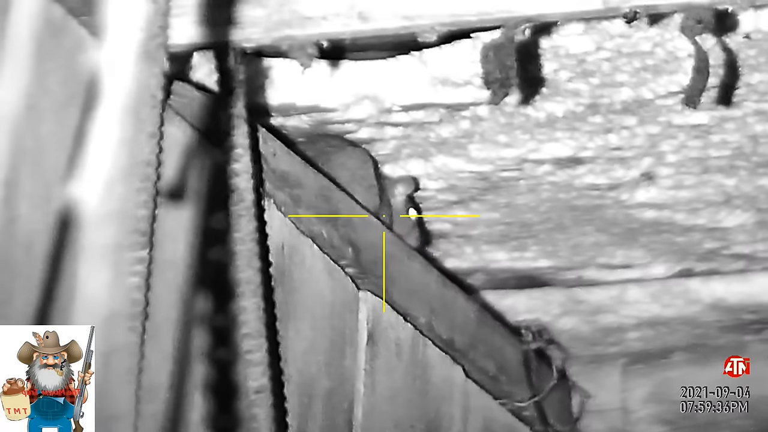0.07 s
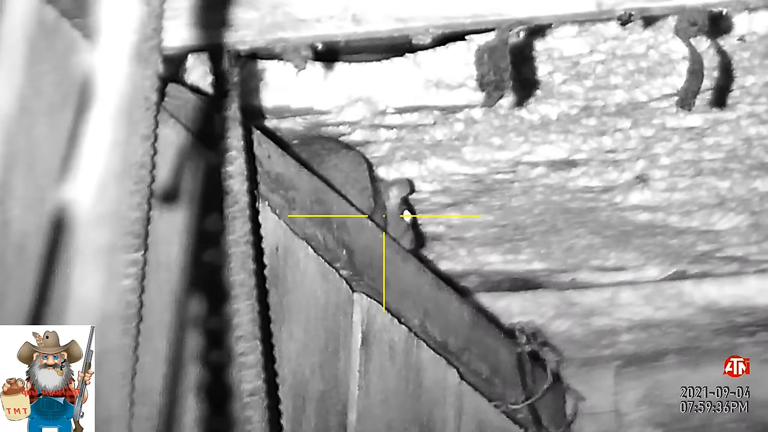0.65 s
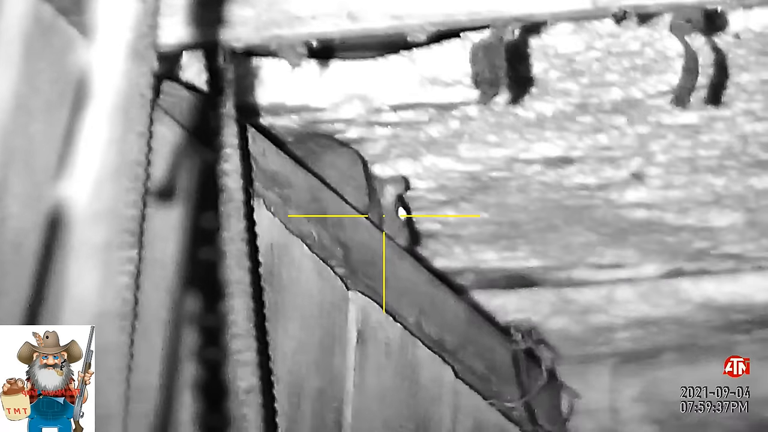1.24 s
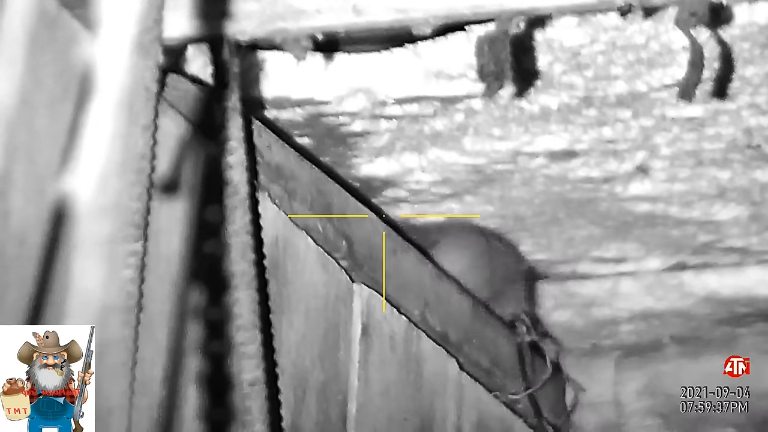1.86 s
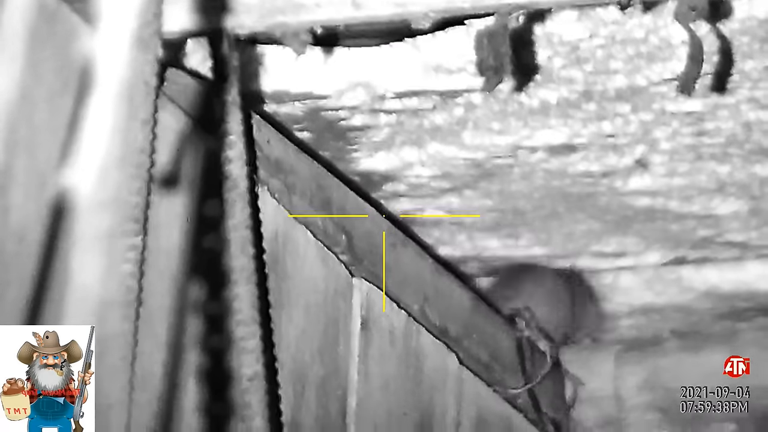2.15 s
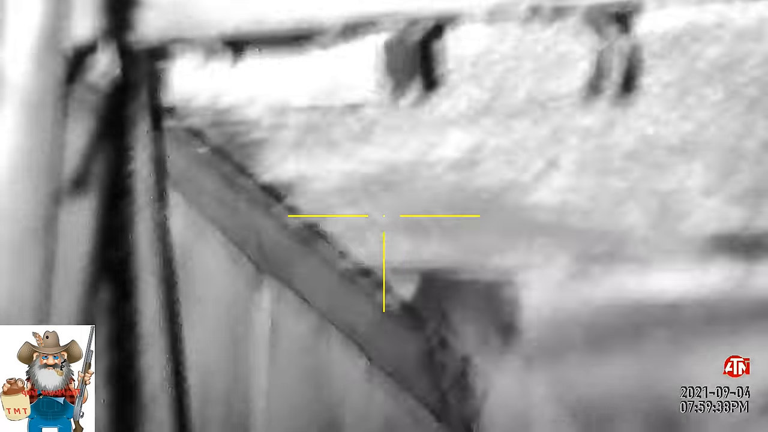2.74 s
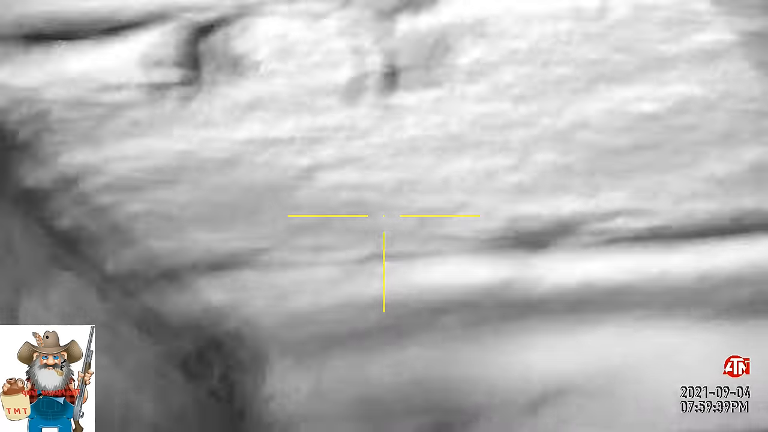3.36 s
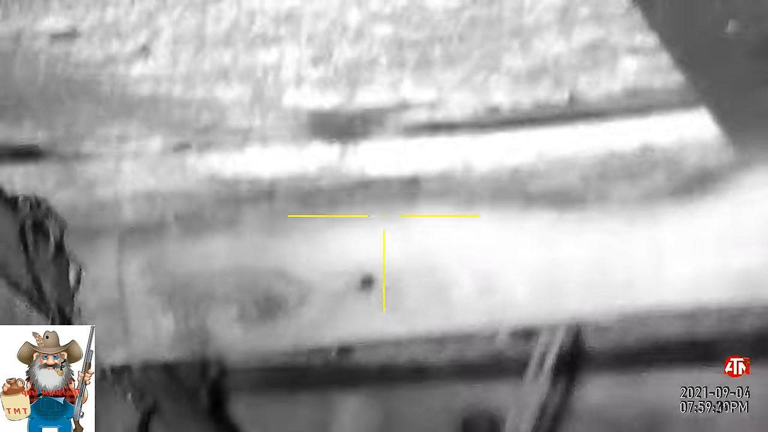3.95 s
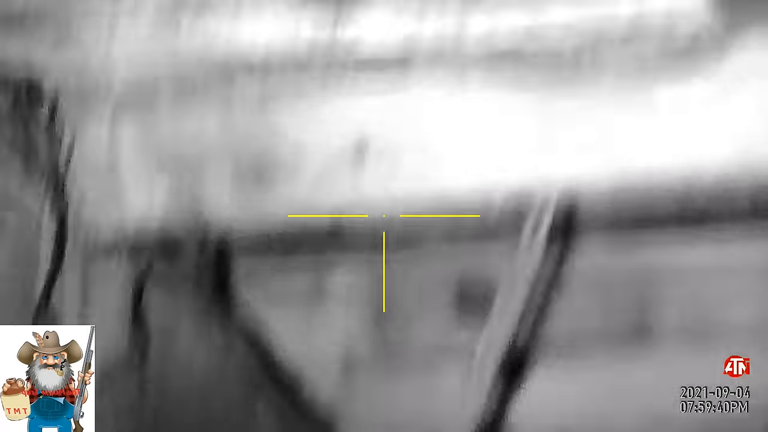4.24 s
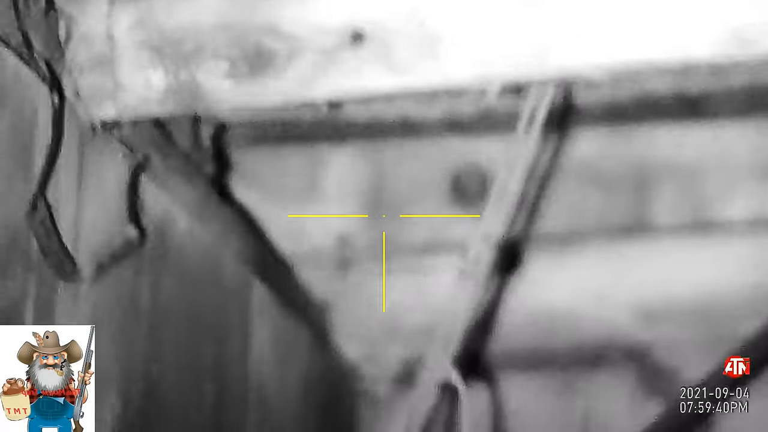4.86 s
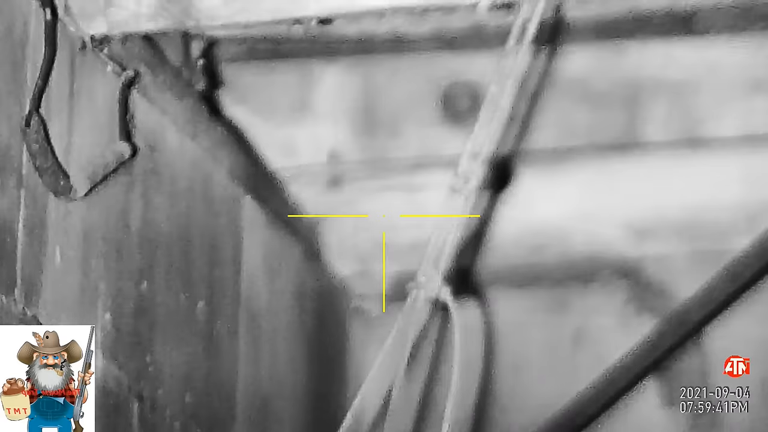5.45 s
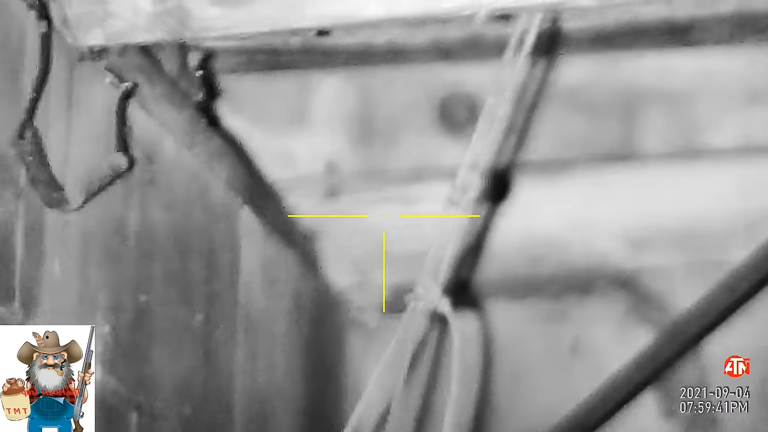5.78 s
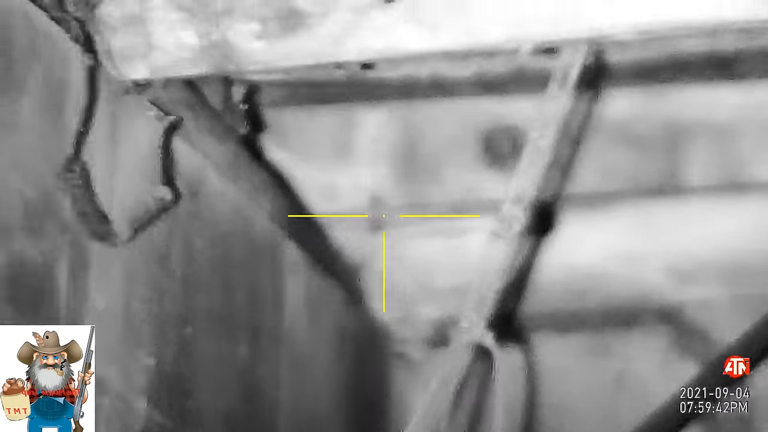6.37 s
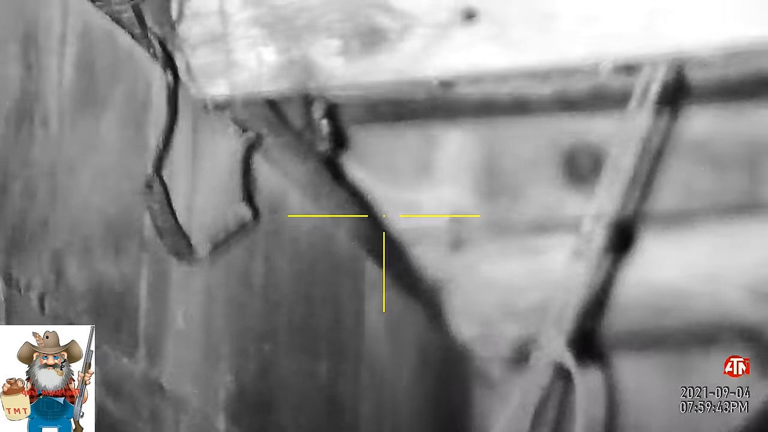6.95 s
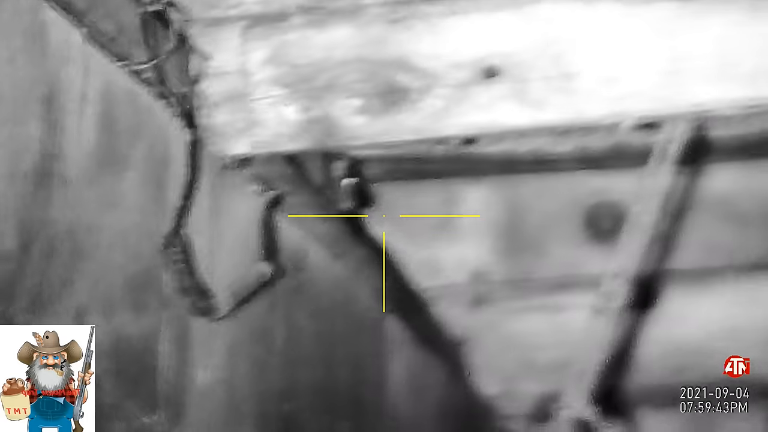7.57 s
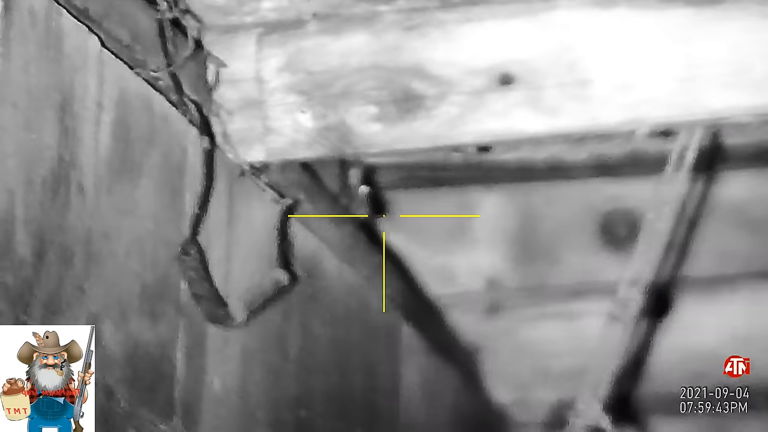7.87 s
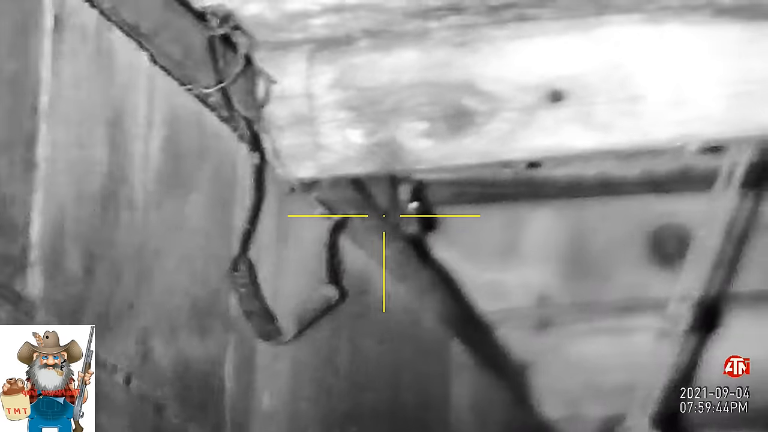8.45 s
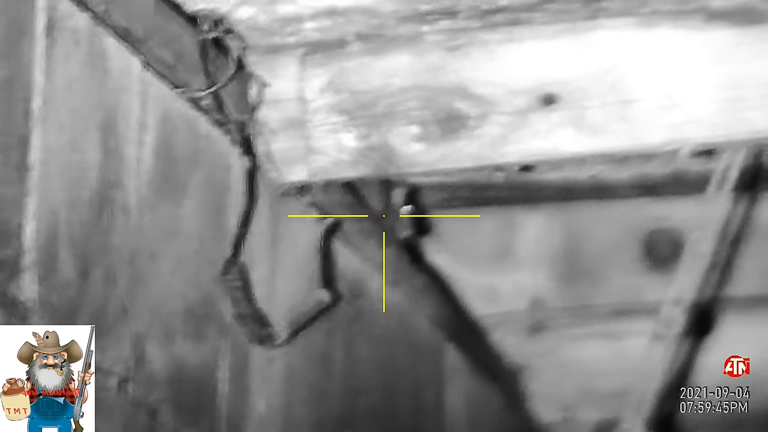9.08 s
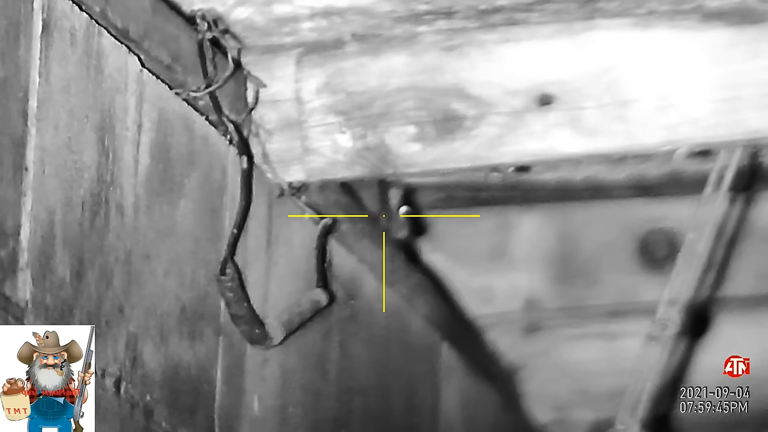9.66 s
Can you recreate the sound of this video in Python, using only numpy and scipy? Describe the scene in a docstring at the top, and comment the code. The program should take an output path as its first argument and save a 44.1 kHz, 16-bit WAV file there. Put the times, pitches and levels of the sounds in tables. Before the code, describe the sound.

A cricket chirps steadily in a farm building at night, over faint hiss and hum. An air rifle fires once, right at the microphone, with a loud, sharp crack and a short echo. About a second later its action is cycled in a quick run of metal clicks and scrapes. A few softer knocks and hand rubs follow, then the cricket carries on with only an odd small click.

```python
"""An air rifle fires once at night: the hammer strikes the valve, air bursts from the muzzle and a
farm building throws the report back. The action is cycled in a run of sharp metal clicks and scrapes,
and hands rub on the rifle, all right at the microphone in its sight. Behind it a cricket chirps
steadily in the building, each wing stroke a falling tone, over a bed of soft air, far insects,
faint whistles, a low motor hum and the thin whine of the sight's electronics."""
import sys
import numpy as np
from scipy import signal
from scipy.fft import rfft, irfft
from scipy.io import wavfile
from scipy.ndimage import uniform_filter1d, minimum_filter1d

SR = 44100
rng = np.random.default_rng(int(sys.argv[2]) if len(sys.argv) > 2 else 0)


def generate_wav(sig):
    """Save sig (samples, or channels by samples) to the path in sys.argv[1] as 16-bit PCM at SR."""
    pcm = np.round(np.clip(np.atleast_2d(sig).T, -1, 1) * 32767).astype(np.int16)
    wavfile.write(sys.argv[1], SR, pcm)


N = 428652
T = np.arange(N) / SR

# Night air and microphone hiss. Each row: frequency in Hz, relative level in dB.
AIR_EQ = [(20, 12.5), (45, 1), (100, -1.5), (250, -3), (500, -2), (1000, -1), (1700, -6), (2900, -9.5),
          (5600, -11.5), (10500, -13), (15500, -12)]
# The far motor's tones. Each row: pitch in Hz, level in dB.
MOTOR_TONES = [(85, -85), (212, -91), (255, -87.5), (382, -79.5)]
# A low murmur of air, then far insects. Each row: centre in Hz, width in Hz, level in dB,
# throbs a second, throb depth from 0 to 1.
DRONE_BANDS = [(363.8, 110, -77.5, 0.92, .05), (2170, 900, -84, 9.6, .3), (4934, 490, -74, 3.1, .25),
               (6254, 490, -77.5, 7, .3), (7400, 1100, -76, 5.5, .6)]
# The sight's whine. Each row: centre in Hz, width in Hz, level in dB, pulsing share from 0 to 1.
WHINE_BANDS = [(12770, 450, -66, .2), (14150, 1200, -70.5, .55)]
# The building's reverb, scaled for each space. Each row: frequency in Hz, time to fall 60 dB in seconds.
BUILDING_DECAY = [(100, 0.93), (350, 0.77), (700, 0.68), (1500, .58), (3000, .54), (6000, .47),
                  (10000, .39), (15000, 0.51)]
# The cricket's runs of chirps. Each entry: start in seconds.
RUN_STARTS = [.042, 1.884, 2.122, 4.425, 5.583, 6.738, 8.589, 8.837]
# Resonances of the cricket's corner and of the rifle's metal action, small parts and stock.
# Each row: frequency in Hz, width in Hz, relative level in dB.
CORNER_MODES = [(3570, 40, -11.5), (3500, 12, -7.5), (3682, 45, -5), (3896, 30, 3), (4000, 54, -10.5)]
ACTION_MODES = [(2276, 130, -2), (2600, 200, -4.5), (3505, 88, -7), (4330, 340, -2), (4910, 150, -4),
                (5824, 550, -13)]
SMALL_PART_MODES = [(7050, 130, -8), (8490, 190, 1.5), (9540, 440, 2), (11800, 3300, -3),
                    (14200, 3800, -10.5)]
STOCK_MODES = [(110, 150, -17.5), (450, 58, -12), (777, 110, 0), (1030, 180, 2), (1366, 410, 2)]
# Hands on the rifle. Each row: start in seconds, length in seconds, level in dB, centre in Hz, width in Hz.
HAND_RUBS = [(0.944, .11, -59, 5340, 7000), (1.807, 0.12, -49, 6230, 8880), (2.21, 0.14, -63, 6000, 8000),
             (3.216, 0.55, -60, 2030, 1805), (3.764, .8, -67, 9260, 5000)]
# Parts of the action sliding. Each row: start in seconds, length in seconds, scrape level in dB.
ACTION_SLIDES = [(2.298, 0.051, -41), (2.377, 0.07, -36), (2.469, 0.05, -38), (2.637, 0.0736, -47),
                 (2.865, 0.104, -46)]
# Hits in the rifle: hammer and valve, cocking and loading, handling. Each row: start in seconds,
# peak in dB ahead of the limiter, then stock thud and bright tick, both in dB against the metal's ring.
RIFLE_HITS = [(1.3284, 5, -12.5, -6), (1.333, 1.5, -13, -9), (2.3154, -20.5, -13.5, -10.5),
              (2.344, -15.5, -15.5, -12), (2.376, -10.5, -18, -0.5), (2.400, -17, -9, -6),
              (2.449, -27.5, -5.5, 1), (2.477, -18.5, -15, -11), (2.5, -11.5, -19, -16.5),
              (2.5063, -2, -16, -10.5), (2.663, -30, -7, -1), (2.705, -28, -8.5, -11),
              (2.743, -23, -14, -16), (2.851, -29, -12.5, -8.5), (2.981, -31.5, -6, -12),
              (3.3645, -17, -3, -4.5), (3.3875, -21.5, 14, -30), (3.42, -36, -1, -16),
              (3.777, -28.5, -6, -29), (6.924, -36.5, -22, -35), (8.421, -26.5, -9, -14)]
# The air tube's ring. Each row: pitch in Hz, time to fall 60 dB in seconds, level in dB against the hit.
TUBE_MODES = [(1040, 0.3, -44), (2500, .12, -44.5), (3600, .15, -46.5)]
# The tone of a hit scattered by things close by, of the muzzle blast and of its echo off the building.
# Each row: frequency in Hz, relative level in dB.
SCATTER_EQ = [(60, -26), (300, -13.5), (1000, -4), (2000, -3.5), (3000, -0.5), (5000, -2), (8500, -4),
              (15000, -15)]
BLAST_EQ = [(60, -21.5), (300, -17.5), (600, -9), (1050, 0), (1700, -5.5), (2600, -1.5), (5000, 1.5),
            (8000, -3.5), (15000, -7.5)]
ECHO_EQ = [(60, -41.5), (170, -30), (350, -17), (520, -17), (800, -12), (1100, -2.5), (1600, 0.5),
           (2200, -2.5), (3200, -5.5), (4500, -6), (6500, -8.5), (12600, -11.5), (15500, -24)]


def undb(db):
    """Decibels to gain."""
    return 10 ** (np.asarray(db) / 20)


def level(x, db=0):
    """Set the rms level."""
    return x * undb(db) / np.sqrt(np.mean(x ** 2))


def unit(x):
    """Scale to an energy of one."""
    return x / np.sqrt(np.sum(x ** 2))


def fade(t, t60):
    """Exponential decay, 60 dB down at t60."""
    return np.exp(-np.log(1000) * t / t60)


def add(out, s, x):
    """Mix x into out from s seconds on."""
    i = max(int(s * SR), 0)
    out[i:i + len(x)] += x[:max(len(out) - i, 0)]


def read(points, hz):
    """Read a curve on a log-frequency axis."""
    f, value = np.transpose(points)
    return np.interp(np.log(np.maximum(hz, 1)), np.log(f), value)


def equalise(x, points):
    """Shape x with an EQ curve of (Hz, dB) points."""
    return irfft(rfft(x) * undb(read(points, np.fft.rfftfreq(len(x), 1 / SR))), len(x))


def resonate(x, hz, width):
    """One resonance, gain 1 at its centre."""
    return signal.lfilter(*signal.iirpeak(min(hz, .45 * SR), hz / width, fs=SR), x)


def body(x, modes):
    """Play x through a bank of resonances."""
    return sum(undb(db) * resonate(x, hz, width) for hz, width, db in modes)


def band(hz, width, size=N):
    """Noise in a steep band, rms 1."""
    return level(resonate(resonate(rng.standard_normal(size), hz, width), hz, width))


def wander(rate_hz):
    """A smooth random modulator, rms 1."""
    hold = int(SR / rate_hz)
    steps = np.repeat(rng.standard_normal(N // hold + 1), hold)
    return level(uniform_filter1d(uniform_filter1d(steps, hold), hold)[:N])


def reverb(decay_scale, grain_db):
    """One second of dense, uneven echoes; the treble dies before the bass."""
    grain = undb(grain_db * np.repeat(rng.standard_normal(SR // 20 + 1), 20)[:SR])
    spectrum = rfft(level(rng.standard_normal(SR) * grain))
    centres = np.geomspace(60, 16000, 17)
    band_index = np.interp(np.log(np.arange(len(spectrum)) + 1), np.log(centres), np.arange(len(centres)))
    out = 0
    for k, hz in enumerate(centres):
        crossfade = np.maximum(1 - abs(band_index - k), 0)
        out += irfft(spectrum * crossfade, SR) * fade(T[:SR], decay_scale * read(BUILDING_DECAY, hz))
    return out


def night_air(db=-64.5, rumble_db=-80):
    """A soft, even hiss in the centre, with a deep rumble for stereo width."""
    mid = level(equalise(rng.standard_normal(N), AIR_EQ), db) * undb(0.34 * wander(4.5))
    rumble_eq = [(10, -14.5), (25, -11), (100, -10.5), (400, -21), (2000, -26), (15000, -36.5)]
    side = level(equalise(rng.standard_normal(N), rumble_eq), rumble_db)
    return mid + side * np.array([[1], [-1]])


def motor_hum():
    """A far motor: low tones, slightly unsteady in pitch and level."""
    out = 0
    for hz, db in MOTOR_TONES:
        phase = 2 * np.pi * np.cumsum(hz + 0.9 * wander(6)) / SR
        out += level(np.sin(phase) * undb(2 * wander(6)), db)
    return out


def murmur_and_insects():
    """Moving air and far insect choruses: bands of noise that throb loosely."""
    out = 0
    for hz, width, db, rate, depth in DRONE_BANDS:
        throb = np.sin(2 * np.pi * np.cumsum(rate * (1 + 0.22 * wander(1.1))) / SR)
        out += level(band(hz, width) * (1 + depth * throb), db)
    return out


def far_whistles(db=-73, hz=720, glide=0.12, length_s=.13, gap_s=.42):
    """Very faint rising whistles from far away."""
    out, u = np.zeros(N), np.linspace(0, 1, int(length_s * SR))
    for k, (late, pitch, size) in enumerate(rng.standard_normal((int(N / SR / gap_s), 3))):
        phase = 2 * np.pi * np.cumsum(hz * (1 + .08 * pitch) * (1 + glide * u)) / SR
        envelope = undb(db + 3 * size) * np.sin(np.pi * u)
        add(out, (k + 0.34) * gap_s + .07 * late, envelope * np.sin(phase))
    return out


def sight_whine(cycle_hz=20, pulse_t60=0.028, second_pulse_s=.02, waver_hz=50):
    """A thin, wavering whine; the sight's electronics pulse it twice in each cycle."""
    pulses = sum(fade((T - s) % (1 / cycle_hz), pulse_t60) for s in (0, second_pulse_s))
    pulses = level(pulses * undb(2.5 * wander(60.03)))
    out = 0
    for hz, width, db, share in WHINE_BANDS:
        frequency_shift = np.exp(2j * np.pi * np.cumsum(waver_hz * wander(23)) / SR)
        wavering = np.real(signal.hilbert(band(hz, width)) * frequency_shift)
        out += level(wavering * (1 - share + share * pulses), db)
    return out


def chirps(period_s=.2288, strokes=7):
    """Start and stroke count of each chirp: strict time within a run, one extra stroke to close it."""
    rows = []
    for start, end in zip(RUN_STARTS, RUN_STARTS[1:] + [N / SR]):
        last = round((end - start) / period_s) - 1
        rows += [(start + k * period_s, strokes + (k == last)) for k in range(last + 1)]
    return rows


def wing_strokes(rate_hz=50, stroke_s=0.0062, start_hz=4130, end_hz=3430, overtone_db=-32):
    """The dry cricket: each wing stroke is a short falling tone."""
    out, u = np.zeros(N), np.linspace(0, 1, int(stroke_s * SR))
    sweep_hz = start_hz + (end_hz - start_hz) * u
    for s, strokes in chirps():
        for k, place in enumerate(np.linspace(-1, 1, strokes)):
            late, pitch, size = rng.standard_normal(3)
            phase = 2 * np.pi * np.cumsum(sweep_hz * (1 + .004 * pitch)) / SR
            tone = np.sin(phase) + undb(overtone_db) * np.sin(2 * phase)
            stroke_db = 1.16 * size - 5 * place ** 2 - 0.5 * place  # a chirp is softer at both ends
            envelope = undb(stroke_db) * np.sin(np.pi * u) ** 2
            add(out, s + k / rate_hz - stroke_s / 2 + .0005 * late, envelope * tone)
    return out


def cricket(db=-55.0, boards_db=0, hall_db=-7, corner_db=-2):
    """Nearby boards fill the gaps between wing strokes, the building rings on, the corner colours it."""
    direct = wing_strokes()
    boards = reverb(decay_scale=.25, grain_db=1) * (T[:SR] > .004)
    hall = reverb(decay_scale=1.0, grain_db=0.0)
    heard = level(direct)
    for space, send_db in (boards, boards_db), (hall, hall_db):
        heard += level(signal.oaconvolve(direct, space)[:N], send_db)
    return level(level(heard) + level(body(heard, CORNER_MODES), corner_db), db)


def rubs_and_scrapes(attack_share=0.11, grain_db=1.5, scrape_hz=2800, scrape_width_hz=5100):
    """Hands rub on the rifle and its parts scrape: grainy noise that swells quickly and dies away."""
    out = np.zeros(N)
    scrapes = [(*slide, scrape_hz, scrape_width_hz) for slide in ACTION_SLIDES]
    for s, length, db, hz, width in HAND_RUBS + scrapes:
        u = np.linspace(0, 1, int(length * SR))
        envelope = np.interp(u, [0, attack_share, 1], [0, 1, 0])
        add(out, s, undb(db) * envelope * band(hz, width, size=SR)[:len(u)])
    return out * undb(grain_db * wander(150))


def slide_clicks(gap_s=.019, above_scrape_db=10, thud_db=-8, tick_db=-15):
    """A sliding part catches again and again in light, uneven clicks; rows as in RIFLE_HITS."""
    rows = []
    for s, length, db in ACTION_SLIDES:
        catches = np.arange(s + gap_s / 2, s + length, gap_s)
        for at, (late, size, bright) in zip(catches, rng.standard_normal((16, 3))):
            peak_db = db + above_scrape_db + 2 * size
            rows.append((at + 0.18 * gap_s * late, peak_db, thud_db, tick_db + 4 * bright))
    return rows


def hammer_bounces(start_s=1.3445, gap_s=0.017, db=-6, loss_db=1.5, thud_db=-24, tick_db=-2.5):
    """The hammer bounces on the valve after the shot, weaker each time; rows as in RIFLE_HITS."""
    return [(start_s + k * gap_s, db - k * loss_db, thud_db, tick_db) for k in range(3)]


def struck(modes, spread_db=4.0, detune=0.06):
    """A fresh point of contact: the resonances shift a little and share the hit differently."""
    chance = rng.standard_normal((len(modes), 2))
    return [(hz * (1 + detune * pitch), width, db + spread_db * size)
            for (hz, width, db), (pitch, size) in zip(modes, chance)]


def metal_hit(thud_db, tick_db, chatter_t60=0.016, attack_s=0.00043):
    """Metal seats on metal and chatters briefly; action, small parts and stock ring. Peaks near 1."""
    t = T[:SR // 20]
    chatter = rng.standard_normal(len(t)) * fade(t, chatter_t60) * np.minimum(t / attack_s, 1)
    # less tick means a softer contact, which also misses the action's upper modes
    top_hz = np.clip(7500 * undb(0.88 * (tick_db + 8.5)), 2800, 12000)
    contact_filter = signal.butter(2, [1850, top_hz], "band", fs=SR)
    ring = signal.lfilter(*contact_filter, body(chatter, struck(ACTION_MODES)))
    tick = signal.lfilter(*signal.butter(2, 5500, "high", fs=SR), body(chatter, struck(SMALL_PART_MODES)))
    thud = body(chatter, struck(STOCK_MODES))
    hit = unit(ring) + undb(tick_db) * unit(tick) + undb(thud_db) * unit(thud)
    return hit / np.sqrt(2 * np.max(uniform_filter1d(hit ** 2, size=32)))


def rifle_action(scatter_db=-3, bloom_s=0.0068):
    """Every hit in the rifle, with a tail of ringing air tube and echoes from things close by."""
    out, t = np.zeros(N), T[:SR]
    tube = sum(undb(db) * np.sin(2 * np.pi * hz * t) * fade(t, t60) for hz, t60, db in TUBE_MODES)
    scatter = equalise(reverb(decay_scale=.45, grain_db=2), SCATTER_EQ)
    envelope = (1 - np.exp(-t / bloom_s)) * (t < .7)
    tail = tube + undb(scatter_db) * unit(scatter * envelope)
    for s, db, thud_db, tick_db in RIFLE_HITS + hammer_bounces() + slide_clicks():
        add(out, s, undb(db) * metal_hit(thud_db, tick_db))
        add(out, s, undb(db) * tail)
    return out


def rifle_report(shot_s=1.333, blast_db=-18, echo_s=1.384, echo_db=-10.5, swell_s=0.02944):
    """Air bursts from the muzzle; the building answers with a swelling, slowly dying echo."""
    out, t = np.zeros(N), T[:SR]
    head = SR // 20  # the first 50 ms set each level
    fade_out = np.minimum((1 - t) * 10, 1)
    blast = equalise(reverb(decay_scale=.42, grain_db=2), BLAST_EQ)
    add(out, shot_s, undb(blast_db) * blast / np.std(blast[:head]) * fade_out)
    echo = equalise(reverb(decay_scale=0.92, grain_db=1.5), ECHO_EQ)
    swell = np.sin(np.pi / 2 * np.minimum(t / swell_s, 1)) ** 2
    add(out, echo_s, undb(echo_db) * echo / np.std(echo[:head]) * swell * fade_out)
    return out


def scene():
    """The rifle up front and centre, over the night bed."""
    bed = cricket() + murmur_and_insects() + motor_hum() + sight_whine() + far_whistles() + night_air()
    return bed + rifle_report() + rubs_and_scrapes() + rifle_action()


def record(dry):
    """A fast limiter holds down the hardest hits, what gets past it clips, and the top is cut."""
    threshold, window, top_hz = 1.2, 65, 15900
    gain = minimum_filter1d(threshold / np.maximum(abs(dry).max(axis=0), threshold), size=window)
    clipped = np.clip(dry * uniform_filter1d(gain, size=window), -1, 1)
    return signal.sosfilt(signal.ellip(10, .1, 90, top_hz, fs=SR, output="sos"), clipped)


dry = scene()
out = record(dry)
generate_wav(out)
```